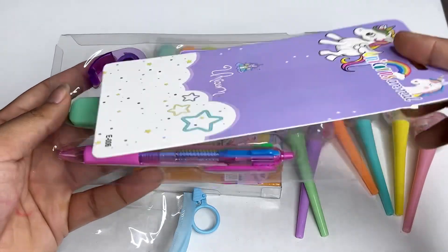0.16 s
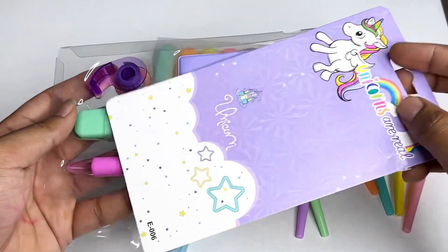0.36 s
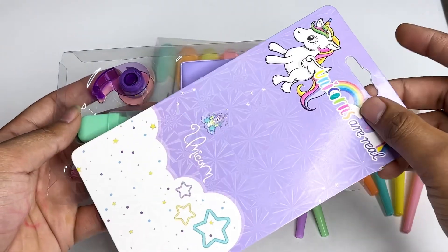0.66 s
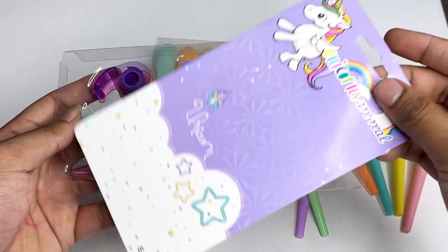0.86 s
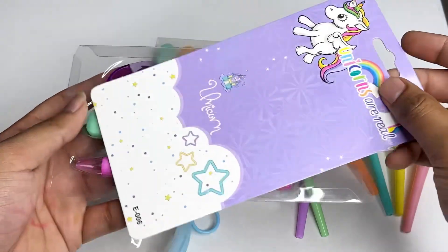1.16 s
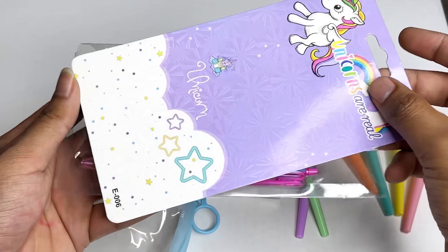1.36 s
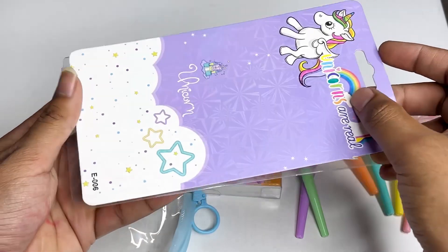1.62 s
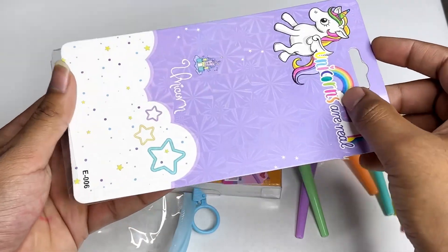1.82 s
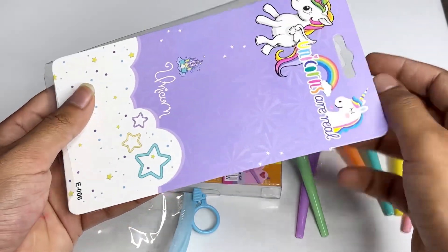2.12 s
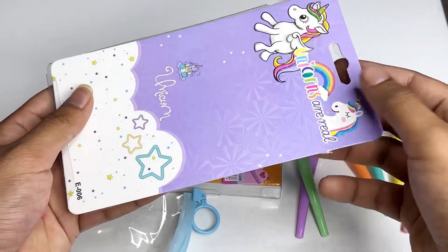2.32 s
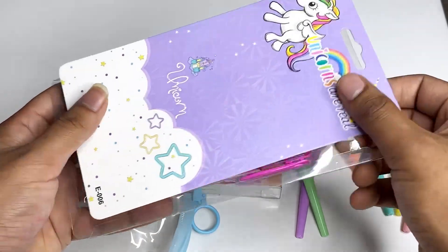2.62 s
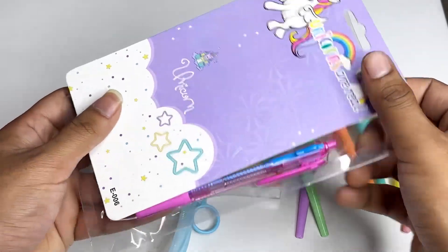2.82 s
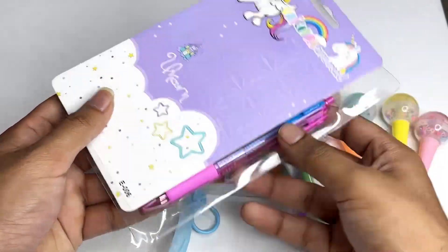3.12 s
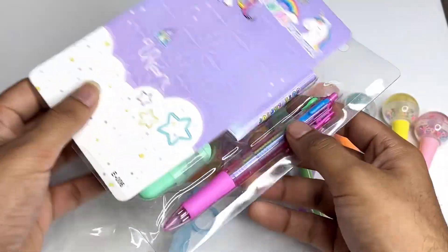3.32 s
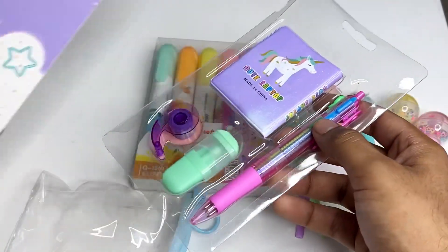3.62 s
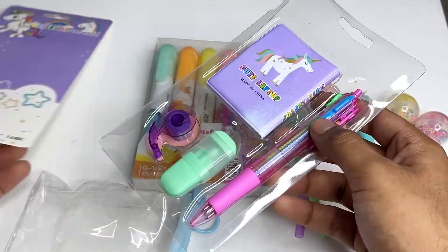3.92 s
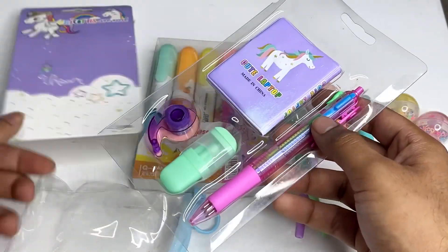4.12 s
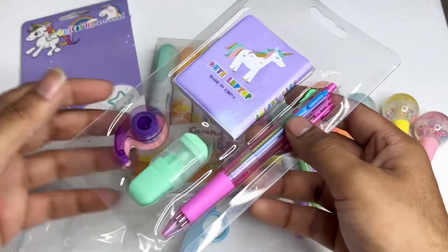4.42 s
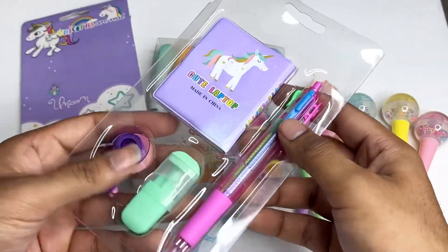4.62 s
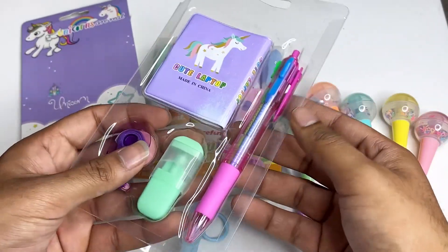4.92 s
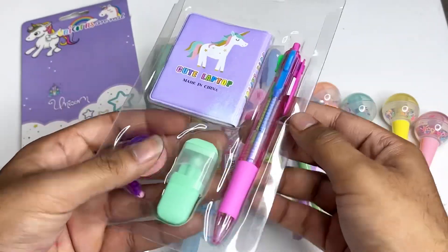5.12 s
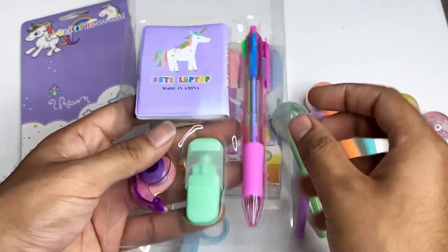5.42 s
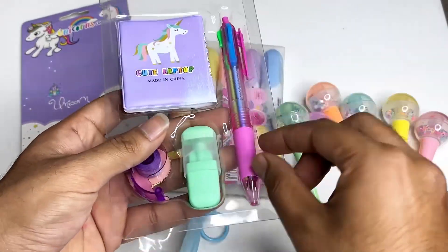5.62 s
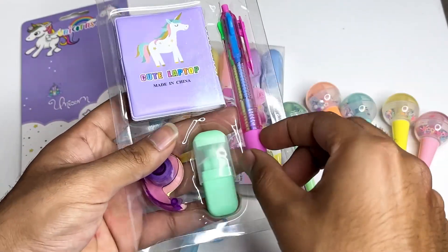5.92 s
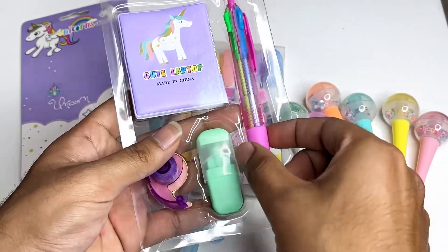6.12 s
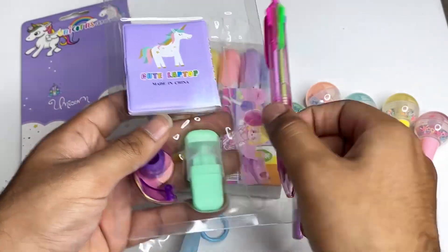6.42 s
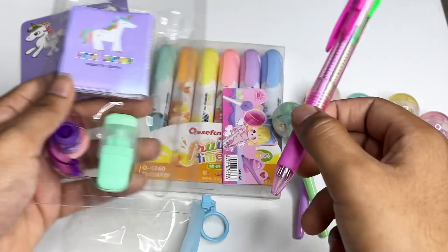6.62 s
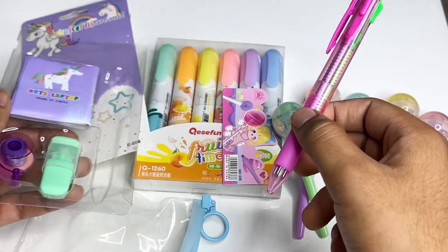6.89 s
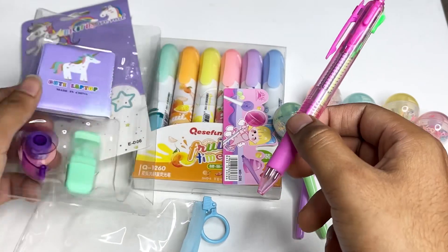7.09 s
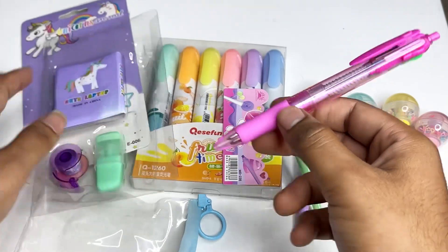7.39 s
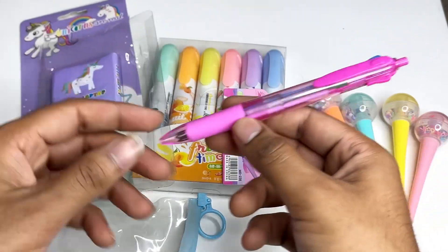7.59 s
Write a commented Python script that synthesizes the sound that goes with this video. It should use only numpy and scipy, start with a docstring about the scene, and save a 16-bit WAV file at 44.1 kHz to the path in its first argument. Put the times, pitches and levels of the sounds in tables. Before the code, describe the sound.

Hands handle a stiff plastic blister pack close to the microphone, in a room with a short, lively echo. From the start there is soft, uneven crinkling with light taps and brief scrapes of card on plastic. A clearer knock with a dull bump comes at about 1 second, and a sharper click and scrape at 2.5. Between 3.1 and 3.5 seconds the backing card slides free with scraping and a faint, thin squeak. Small clusters of knocks follow around 4.2 and 4.6 seconds.

From 5.8 to 6 seconds the plastic snaps loudly three times as a pen is pried out, each crack ringing briefly and hollowly. A fourth snap at 6.3 is the loudest, with a low thump. Lighter knocks, scrapes and rustling continue until about 7.4 seconds, then fade. Faint handling rumble and a low hum lie underneath.

```python
"""A stiff plastic blister pack snaps loudly four times as a pen is pried out: the pocket wall buckles and rings.
Before that, hands slide out the backing card, and stick-slip friction scrapes and squeaks on the plastic.
Card, shell and pen knock, each impact coloured by its weight and hardness; the grip drives rustle and ticks.
The pack bumps against palm and table. A live room reverberates to two close microphone ports,
over handling rumble, faint air, mains hum and a low drone."""
import sys
import numpy as np
from scipy import signal
from scipy.fft import rfft, irfft, next_fast_len
from scipy.io import wavfile
from scipy.ndimage import uniform_filter1d, map_coordinates

SR = 44100
rng = np.random.default_rng(int(sys.argv[2]) if len(sys.argv) > 2 else 0)


def to_wav(sig):
    """Store sig (one row per channel, or 1-D mono) as 16-bit WAV at the path in sys.argv[1].

    Samples outside -1..1 are clipped; the rate is SR.
    """
    pcm = np.clip(np.atleast_2d(sig), -1, 1) * 32767
    pcm = np.round(pcm).astype(np.int16)
    wavfile.write(sys.argv[1], SR, pcm.T)  # frames by channels


N = 341775

# buckles of the pocket, with thump, shell and edge relative to the crack:
# start_s, crack_db, thump_db, shell_db, edge_db, decay_ratio, shell_hz, crack_hz
SNAPS = [(5.8383, -29, -24, -1.5, -2, 0.99, 1100, 4740), (5.975, -34, -27, -10.5, -0.5, 0.63, 1000, 4530),
         (6.0368, -22, -24, -7.5, 2.5, 0.94, 1400, 4550), (6.3379, -19, -16.5, 0, -1, 1.7, 1100, 2590)]
# spectrum of a snap: frequency_hz, level_db
SNAP_SPECTRUM = [(40, -19), (120, 2.5), (300, -7), (600, -3), (1000, -0.5), (1900, 1), (2600, 2), (4200, 4),
                 (5200, 3), (6200, 7), (8000, 0), (12000, -7.5), (14000, -18.5), (16500, -17.5)]
# hollow modes of the emptied pocket: pitch_hz, level_db, t60_s
POCKET_MODES = [(1070, -20, 0.089), (1112, -10.5, 0.22), (1173, -13.5, 0.2), (2680, -24.5, .15),
                (3220, -26, 0.2)]
def snaps():
    """Snap-through buckling: the pocket wall flips over the pen's barrel, then rings in damped modes."""
    out, t = np.zeros(N), np.arange(SR // 4) / SR
    for start_s, db, thump, shell, edge, decay_ratio, *spot_hz in SNAPS:
        noise = rng.standard_normal(len(t))
        bands = registers(noise, SNAP_SPECTRUM, spot_hz, q=3, spot_db=4.5, lumps_db=3.0)
        levels_db = db + np.array([thump, shell, 0, edge])
        t60_s = decay_ratio * np.array([0.091, 0.026, 0.011, 0.007])
        add(out, start_s, flex(bands, levels_db, t60_s, rise_s=0.0006, travel_s=0.00029))
        hollow = sum(amp(level - 60 * t / t60) * np.sin(2 * np.pi * hz * t)
                     for hz, level, t60 in POCKET_MODES)
        add(out, start_s + 0.002, amp(db + shell - 4.5) * hollow)
    return amp(0.5) * out


def flex(bands, levels_db, t60_s, rise_s, travel_s):
    """Dispersion of bending waves: in a sudden bend the treble arrives first and rises fastest."""
    slowness = np.array([[4], [2], [1], [1 / 2]])  # relative to the crack band
    t = np.maximum(np.arange(bands.shape[1]) / SR - travel_s * slowness + travel_s / 2, 0)
    attack = 1 - np.exp(-(t / (rise_s * slowness)) ** 2)
    bands = bands * attack * amp(-60 * t / np.array(t60_s)[:, None])
    bands *= np.sqrt(SR / 100) / np.linalg.norm(bands, axis=1, keepdims=True)  # energy of 10 ms at rms 1
    return amp(levels_db) @ bands


# boundaries between the wall's four bands: frequency_hz
CROSSOVERS_HZ = [350, 1600, 5600]
def registers(x, spectrum, spot_hz, q, spot_db, lumps_db):
    """Modal colouring: the touched spot shapes x, split into thump, shell, crack and edge at rms 1."""
    def split(hz):
        lowpasses = [0 * hz] + [1 / (1 + (hz / edge) ** 5) for edge in CROSSOVERS_HZ] + [0 * hz + 1]
        spot = sum(1 / (1 + (q * (hz / centre - centre / (hz + 1))) ** 2) for centre in spot_hz)
        # lesser modes lie differently at every spot
        knots = np.linspace(np.log(200), np.log(SR / 2), 60)
        lumps = np.interp(np.log(hz + 1), knots, rng.standard_normal(60))
        return np.diff(lowpasses, axis=0) * amp(along(spectrum, hz) + spot_db * spot + lumps_db * lumps)
    return np.array([unit(band) for band in filtered(x, split)])


# contacts of card, shell and pen: start_s, crack_db, weight_db, hardness_db, spot_hz
TAPS = [(0.1699, -54.5, -1, 3.5, 481), (.2304, -50, -1.5, -4, 1140), (.2558, -54.5, -4, 5, 870),
        (0.2704, -52.5, 0, -3, 900), (.3293, -53.5, -3, -6, 700), (.3627, -51.5, -3, -4, 970),
        (0.995, -35.5, 0, -2.5, 1176), (1.0034, -38.5, 2, -1, 700), (1.1336, -48.5, 4, -5.5, 594),
        (1.457, -47.5, -1, 1, 1400), (1.6489, -51, -5.5, -20, 996), (1.87, -53, -3.5, 2, 833),
        (1.91, -48.5, 1, 7, 960), (1.9489, -45, -2, -0.5, 1420), (2.1124, -52.5, -18, -8, 862),
        (2.2045, -55.5, -6, 4, 900), (2.241, -60.5, 0, -18, 1106), (2.437, -58, -1, -18, 1200),
        (2.5529, -28, -9, -10, 1404), (2.7862, -60.5, 10.5, -7, 860), (2.932, -58.5, 12.5, -4, 847),
        (3.152, -58, 13.5, 5, 840), (3.2532, -45.5, 3.5, -26, 840), (3.385, -44.5, -6, 1, 1500),
        (3.4876, -44.5, 2.5, -1.5, 616), (3.5137, -48.5, -2, -25, 884), (3.8333, -58, 8.5, -28, 950),
        (3.8537, -43.5, -12, -28, 1560), (3.902, -50.5, -6, -30, 1500), (4.1894, -49, 0, -16, 1297),
        (4.2058, -42.5, -1, -12, 1100), (4.2141, -37.5, -2, -4, 1060), (4.2917, -54.5, 4, -9, 1330),
        (4.6015, -52, 4, -7, 880), (4.619, -36.5, -1, -7, 700), (4.6427, -42.5, -2, -12, 960),
        (4.836, -63.5, 6, 0, 776), (4.9676, -52, -2, -1, 1080), (5.025, -60, 1, 3, 1082),
        (5.068, -56, 3.5, -3.5, 650), (5.1317, -55.5, 7.5, -8, 510), (5.259, -65.5, 15, 4, 640),
        (5.2932, -52.5, 6, -6, 1200), (5.5817, -63, 11, -10, 1070), (6.252, -56, 10, -6, 600),
        (6.54, -40.5, -1, -5, 506), (6.7274, -40.5, -1, -10, 454), (6.8544, -39, -6, -6, 1200),
        (6.94, -47, 8.5, 1, 1120), (7.0727, -36, 2.5, -9, 1140), (7.1472, -59.5, 15.5, 5, 1160),
        (7.2163, -56, 12.5, -11, 900), (7.257, -42, 0.5, -8.5, 882), (7.326, -42.5, 1.5, -15, 1294),
        (7.3311, -43, 4.5, -18, 1207)]
def taps():
    """Impact excitation: card, shell and pen knock lightly together."""
    out = np.zeros(N)
    for start_s, *touch in TAPS:
        add(out, start_s, knock(*touch))
    return out


SPOT_SCATTER = 0.074  # relative spread of the resonances from touch to touch
# spectrum of a knock: frequency_hz, level_db
KNOCK_SPECTRUM = [(40, -2.5), (110, 1), (300, -1.5), (700, 5.5), (1200, 5.5), (2600, -3.5), (4200, -2),
                  (5200, -4), (6500, -10), (9500, -17.5), (12500, -19.5), (16500, -32.5)]
def knock(db, weight_db, hardness_db, spot_hz):
    """Impulse response of a thin wall: one contact excites a dense cluster of quickly dying modes."""
    crack_hz = 2470 * np.exp(SPOT_SCATTER * rng.standard_normal())
    noise = rng.standard_normal(4096)
    bands = registers(noise, KNOCK_SPECTRUM, [spot_hz, crack_hz], q=2.0, spot_db=8.5, lumps_db=1.7)
    levels_db = register_levels(db, weight_db, hardness_db, thump_db=-8.5)
    t60_s = [0.11, 0.023, 0.013, 0.01284]
    return amp(-2.0) * flex(bands, levels_db, t60_s, rise_s=0.00075, travel_s=0.00069)


def register_levels(db, weight_db, hardness_db, thump_db):
    """Contact spectrum: a heavy touch moves the whole pack and adds bass, a hard one adds treble."""
    return db + np.array([thump_db + 0.65 * weight_db, weight_db, 0, hardness_db])


# strokes of card and fingers over the plastic: start_s, length_s, level_db, weight_db, hardness_db
STROKES = [(.1, 0.065, -60, -1, -.5), (0.249, 0.023, -52.5, 5, -13), (.344, 0.037, -58.5, 6, 2),
           (.45, 0.05, -55.5, -4.5, -0.5), (.558, .066, -64.5, 6, 1), (0.794, 0.043, -57.5, 2.5, -6),
           (1.324, 0.05, -57, -3.5, -1), (1.544, 0.078, -54, -3, 0), (1.781, 0.038, -58.5, -1.5, -3),
           (1.96, 0.031, -48.5, -1, -1.5), (2.091, 0.017, -52.5, -4.5, -4), (2.188, 0.042, -55.5, 1, -7),
           (2.274, 0.06, -62.5, 0, -1.5), (2.447, 0.063, -48, -5, -8), (2.54, 0.043, -38.5, 0, 2.5),
           (2.604, 0.17, -52, -1.5, -5.5), (2.886, 0.018, -56.5, 5.5, -2), (3.129, 0.097, -51.5, -1, -4.5),
           (3.199, 0.13, -47, -4, -2), (3.38, .041, -37.5, -14, 3), (3.462, .013, -49.5, 0, 8),
           (4.145, 0.034, -55, 4.5, -8), (4.511, 0.09, -58, -1.5, -2.5), (4.598, 0.057, -46, 1, -8),
           (4.972, 0.027, -56.5, 1.5, -8), (5.101, 0.058, -54, -4.5, -6.5),
           (5.282, 0.025, -46, -1.5, -11.5), (5.72, 0.12, -66.5, 9, -13), (5.964, .021, -57.5, 18, -18),
           (6.174, 0.1, -55, 5.5, -2.5), (6.694, 0.042, -56, -1, -1), (6.95, .022, -49, -1, -18),
           (6.997, .11, -55.5, -6, -1.5), (7.292, 0.095, -49.5, -5, -9)]
# spectrum of a scrape: frequency_hz, level_db
SCRAPE_SPECTRUM = [(40, -7.5), (110, 1.5), (400, 3.5), (1000, 3.5), (2400, -5), (4200, -7), (5200, -5),
                   (6500, -8), (10000, -14), (12500, -17.5), (16000, -26)]
def scrapes():
    """Sliding friction: each stroke grips, chatters along the plastic and lets go."""
    out = np.zeros(N)
    for start_s, length_s, db, weight_db, hardness_db in STROKES:
        n = int((length_s + 0.044) * SR)
        t = np.arange(n) / SR
        swell = 1.078 * (1 - np.exp(-t / (0.16 * length_s)))
        release_db = -60 * np.maximum(t - 0.8 * length_s, 0) / 0.061
        pressure = swell * amp(release_db + 2.95 * wobble(240, n))
        spot_hz = np.array([910, 2400]) * np.exp(SPOT_SCATTER * rng.standard_normal(2))
        friction = slips(n, per_s=1200, spread_db=2.0, hiss=0.9)
        bands = registers(friction, SCRAPE_SPECTRUM, spot_hz, q=2.9, spot_db=4, lumps_db=2.36)
        levels_db = register_levels(db, weight_db, hardness_db, thump_db=-10)
        add(out, start_s, pressure * (amp(levels_db) @ bands))
    return amp(-4.0) * out


def slips(n, per_s, spread_db, hiss):
    """Stick-slip friction: tiny slips of uneven size over a smooth hiss."""
    sizes = amp(spread_db * np.minimum(rng.standard_exponential(n), 3)) * rng.standard_normal(n)
    return unit(sizes * (rng.random(n) < per_s / SR)) + hiss * rng.standard_normal(n)


# bounces of the whole pack against palm or table: start_s, pitch_hz, level_db
BUMPS = [(1.004, 77.6, -36.5), (4.215, 120, -46), (4.629, 82, -44), (6.34, 120, -30), (7.08, 97, -40.5),
         (7.331, 118.6, -41)]
def bumps():
    """Damped oscillation: the soft hand stops each bounce within a few cycles."""
    out, t = np.zeros(N), np.arange(SR // 4) / SR
    swing = (1 - np.exp(-t / 0.005)) * amp(-60 * t / 0.11)
    for start_s, hz, db in BUMPS:
        add(out, start_s, amp(db + 2.5) * swing * np.sin(2 * np.pi * hz * t))
    return out


# skin squeaks on plastic and the card's edge zips free:
# start_s, length_s, first_hz, last_hz, level_db, scatter_ratio
SQUEAKS = [(0.129, 0.027, 3127, 3270, -62.5, 0.06), (0.166, 0.016, 3450, 3220, -53.5, 0.08),
           (3.308, 0.06, 6800, 11000, -58.5, 0.1), (3.991, 0.155, 1950, 1790, -72.5, 0.06),
           (5.5, 0.15, 559, 514, -68.5, 0.09)]
def squeaks():
    """Nearly periodic stick-slip: slips that fall into step make a thin, broken tone."""
    out = np.zeros(N)
    for start_s, length_s, first_hz, last_hz, db, scatter in SQUEAKS:
        n = int(length_s * SR)
        hz = np.linspace(first_hz, last_hz, n) * (1 + scatter * wobble(1200, n))
        grip = np.sqrt(np.hanning(n)) * amp(3 * wobble(90, n))
        add(out, start_s, amp(db) * unit(grip * np.sin(2 * np.pi * np.cumsum(hz) / SR)))
    return out


# firmness of the fingers, which relax between moves: time_s, level_db
GRIP = [(0, -66), (.45, -61), (.74, -79), (.93, -82), (1.2, -66), (1.55, -58), (1.73, -69), (2.02, -60.5),
        (2.38, -67), (2.6, -64.5), (3.02, -56.5), (3.37, -62), (3.62, -79.5), (4.05, -66.5), (4.48, -89),
        (4.7, -69.5), (5.2, -60.5), (5.46, -88), (5.65, -67.5), (6.0, -60), (6.68, -71), (7.1, -57),
        (7.3, -52.5), (7.55, -84), (7.75, -90)]
# spectrum of the crinkling: frequency_hz, level_db
RUSTLE_SPECTRUM = [(100, -12.5), (400, -1), (1000, -5), (2600, -5.5), (5000, -8), (10000, -13.5),
                   (13000, -19.5), (16000, -29)]
def rustle():
    """Crackling noise: the gripped shell crinkles, its spectrum shifting as the plastic bends."""
    spectra = signal.stft(slips(N, per_s=760, spread_db=1.0, hiss=1.0), nperseg=512)[2]
    bend = uniform_filter1d(rng.standard_normal(spectra.shape), size=5, axis=0)
    bend = uniform_filter1d(bend, size=12, axis=1)
    crinkle = signal.istft(spectra * amp(1.8 * unit(bend)), nperseg=512)[1][:N]
    grip_db, = curves(GRIP)
    flicker_db = 1.8 * wobble(22, N) + 2.0 * wobble(150, N)
    return amp(grip_db - 3.5 + flicker_db) * coloured(crinkle, RUSTLE_SPECTRUM)


def ticks(per_s=9):
    """A Poisson process: the shell gives at random moments, louder under a firmer grip."""
    out = np.zeros(N)
    grip_db, = curves(GRIP)
    for start in np.flatnonzero(rng.random(N) < per_s / SR):
        size, spot = rng.standard_normal(2)
        db = grip_db[start] - 4 + 3.5 * size
        spot_hz = 1000 * np.exp(SPOT_SCATTER * spot)
        add(out, start / SR, knock(db, weight_db=2.5, hardness_db=-9, spot_hz=spot_hz))
    return out


# resonances of the blister shell: centre_hz, width_hz, peak_db
SHELL_MODES = [(693, 44, -17), (880, 190, -12), (1055, 46, -6), (1128, 19, 1), (1188.6, 11, -9),
               (1620, 23, -5), (2576, 190, -0.5), (3000, 64, -14), (3300, 70, -9.5)]
def blister(x, ring_db):
    """Forced resonance: whatever touches the pack drives the shell's modes."""
    def modes(hz):
        return sum(amp(db) * 1j * hz * width / (centre ** 2 - hz ** 2 + 1j * hz * width)
                   for centre, width, db in SHELL_MODES)
    return filtered(x, lambda hz: amp(-1.5) * (1 + amp(ring_db) * modes(hz)))


def room(x, block=11025):
    """Diffuse reverberation: each block gets a fresh random tail, keeping the echo smooth."""
    out = np.zeros((2, N + 2 * SR))
    for start in range(0, N, block):
        part = x[None, start:start + block]
        if part.any():
            echo = signal.fftconvolve(part, walls(), axes=1)
            out[:, start:start + echo.shape[1]] += echo
    return out[:, :N]


# reverberation time: frequency_hz, t60_s
ROOM_DECAY = [(100, .35), (300, 0.89), (1000, 0.54), (3000, 0.59), (6000, 0.512), (12000, 0.36)]
# reverberation relative to the direct sound: frequency_hz, level_db
ROOM_LEVEL = [(80, -0.5), (300, -0.5), (1000, -5), (3000, -3), (6000, -6.5), (12000, -5)]
# left-right likeness of the reverberation: frequency_hz, coherence_ratio
ROOM_COHERENCE = [(60, 0.61), (300, 0.53), (1000, 0.53), (2500, .68), (4000, 1), (16000, 1)]
def walls(early_db=8.0, early_t60_s=0.23, onset_s=0.00085):
    """Room impulse response: near surfaces reflect at once, the walls add a long diffuse tail."""
    hz, t, spectra = signal.stft(rng.standard_normal((2, SR)), SR, nperseg=256)
    tail = amp(-60 * t / along(ROOM_DECAY, hz)[:, None])
    decay = np.hypot(tail, amp(early_db - 60 * t / early_t60_s))
    decay /= np.sqrt(SR * np.mean(decay ** 2, axis=1, keepdims=True))
    side_angle = np.arccos(np.clip(along(ROOM_COHERENCE, hz), -1, 1)) / 2
    gain = amp(along(ROOM_LEVEL, hz)) * np.array([np.cos(side_angle), np.sin(side_angle)])
    mid, side = signal.istft(spectra * decay * gain[:, :, None], SR, nperseg=256)[1]
    onset = 1 - np.exp(-(np.arange(len(mid)) / SR / onset_s) ** 2)
    return np.array([mid + side, mid - side]) * onset


# strength of the handling rumble: time_s, level_db
RUMBLE = [(0, -60.5), (.35, -57), (1.3, -66.5), (2.4, -59.5), (3.3, -61), (3.8, -53.5), (4.2, -61),
          (5.3, -63.5), (6.4, -57.5), (6.75, -63), (7.2, -53.5), (7.75, -63.5)]
# spectrum of the rumble: frequency_hz, level_db
RUMBLE_SPECTRUM = [(20, -32.5), (38, -10.5), (55, 10), (85, -1), (130, -9.5), (250, -9.5), (500, -21.5),
                   (1000, -26), (3000, -51), (9000, -71)]
def rumble():
    """Amplitude-modulated noise: the low rumble of handling swells and fades."""
    db, = curves(RUMBLE)
    return amp(db - 2.0 + 1.2 * wobble(13, N)) * coloured(rng.standard_normal(N), RUMBLE_SPECTRUM)


# course of a low tone: time_s, pitch_hz, level_db
DRONE = [(0, 82.4, -65.5), (.28, 79.72, -51), (.55, 77.6, -61), (.8, 75.1, -73), (2.0, 83.5, -69.5),
         (2.25, 82.2, -69), (2.48, 79.7, -63), (2.7, 77.8, -79)]
def drone():
    """Frequency and amplitude modulation: a low tone glides as it comes and goes."""
    hz, db = curves(DRONE)
    return amp(db + 1.5 * wobble(8.5, N)) * unit(np.sin(2 * np.pi * np.cumsum(hz) / SR))


# spectrum of the room's air: frequency_hz, level_db
AIR_SPECTRUM = [(20, -32.5), (35, -16), (50, 2), (75, -8), (150, -15), (400, -19), (1000, -35.5),
                (3000, -46), (8000, -49.5), (16000, -70.5)]
def air():
    """Stationary noise: faint room air, strongest in the bass."""
    return amp(-68.5) * coloured(rng.standard_normal(N), AIR_SPECTRUM)


def hum(mains_hz=50):
    """Mains hum: one sinusoid wavering in level and phase."""
    level = amp(-70 + 2.5 * wobble(1.7, N))
    return level * unit(np.sin(2 * np.pi * mains_hz * np.arange(N) / SR + 0.8 * wobble(3.6, N)))


def amp(db):
    """Decibels to gain."""
    return 10 ** (np.asarray(db) / 20)


def unit(x):
    """Scale to rms 1."""
    return x / np.sqrt(np.mean(x ** 2) + 1e-20)


def along(points, hz):
    """Interpolate points on a log frequency axis."""
    knots_hz, values = np.transpose(points)
    return np.interp(np.log(hz + 1), np.log(knots_hz + 1), values)


def curves(rows):
    """Interpolate each column after the time to one value per sample."""
    time_s, *columns = np.transpose(rows)
    return [np.interp(np.arange(N) / SR, time_s, column) for column in columns]


def wobble(rate, n):
    """A smooth random curve of n samples, rate knots a second."""
    return map_coordinates(rng.standard_normal(int(n * rate / SR) + 4), [np.arange(n) * rate / SR])


def filtered(x, response):
    """Multiply the spectrum of x by a frequency response."""
    n = x.shape[-1]
    padded = next_fast_len(n + n // 8)
    return irfft(rfft(x, padded) * response(np.fft.rfftfreq(padded, 1 / SR)), padded)[..., :n]


def coloured(x, spectrum):
    """Shape x by a spectrum, at rms 1."""
    return unit(filtered(x, lambda hz: amp(along(spectrum, hz))))


def add(track, start_s, sound):
    """Superpose a sound on the track."""
    start = max(round(start_s * SR), 0)
    track[start:start + len(sound)] += sound[:max(len(track) - start, 0)]


# lead of the left port, mostly in the treble: frequency_hz, phase_rad
PORT_LEAD = [(20, 0), (1200, 0), (2100, .25), (2900, -.45), (3600, -.15), (4950, -.1), (5300, 2.1),
             (6500, 2.3), (7150, 3.6), (7750, 5.6), (8400, 6.2), (9500, 6.4), (11000, 7.8), (12600, 9.4),
             (14500, 11.6), (16500, 12.5)]
# left port relative to the right: frequency_hz, level_db
PORT_BALANCE = [(70, 0), (180, -1.3), (700, -1.2), (1400, -.8), (2600, 1.6), (4000, 0), (16000, 0)]
def ports(x):
    """Spaced receivers: each of two close ports takes half of the level and phase difference."""
    half = np.array([[0.5], [-0.5]])
    def response(hz):
        return amp(half * along(PORT_BALANCE, hz)) * np.exp(1j * half * along(PORT_LEAD, hz))
    return filtered(x, response)


def scene(directions=3):
    """Superposition: the pack, its reverberation and the background meet at the two ports."""
    handling = taps() + scrapes() + rustle() + squeaks() + ticks()
    # a snap radiates differently in each direction, and the room blends them all
    snap_echo = sum(room(snaps()) for _ in range(directions)) / np.sqrt(directions)
    # fingers and card damp the shell, while a snap lets it ring freely
    damped = blister(handling + room(handling), ring_db=-7)
    free = blister(snaps() + amp(-1.3) * snap_echo, ring_db=2.5)
    return ports(free + amp(0.5) * damped + bumps() + rumble() + air() + drone() + hum())


def record(dry):
    """Band limiting: a steep low-pass removes the highest treble."""
    cutoff_hz = 16500
    return filtered(dry, lambda hz: 1 / (1 + (hz / cutoff_hz) ** 120))


dry = scene()
out = record(dry)
to_wav(out)
```